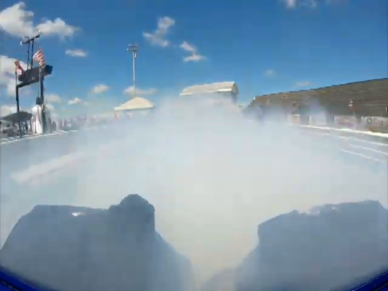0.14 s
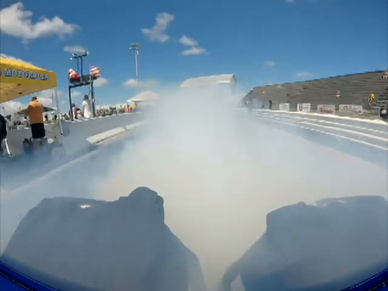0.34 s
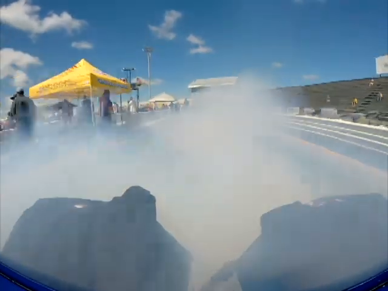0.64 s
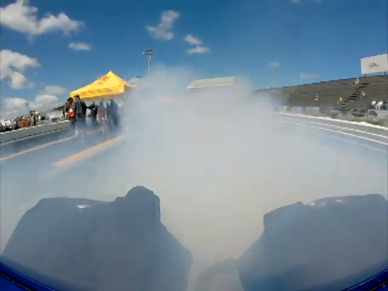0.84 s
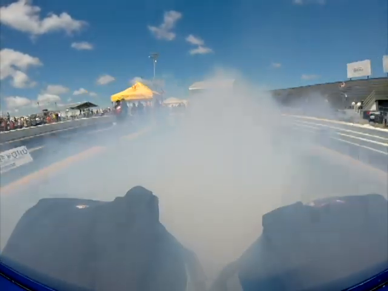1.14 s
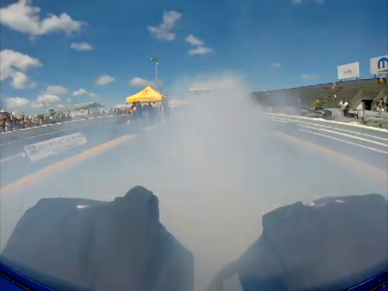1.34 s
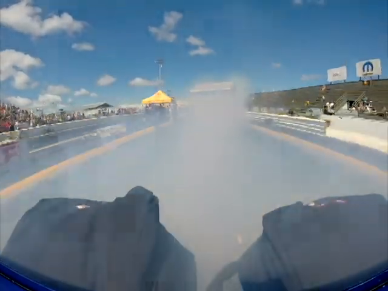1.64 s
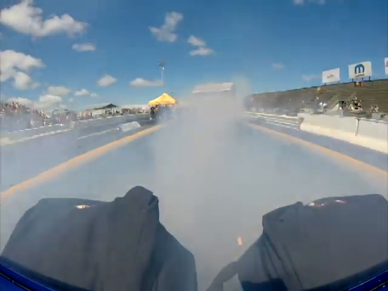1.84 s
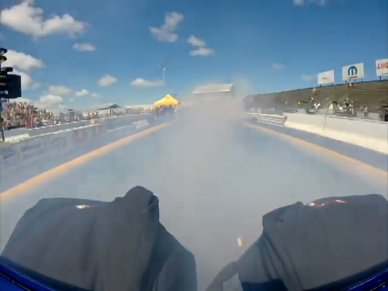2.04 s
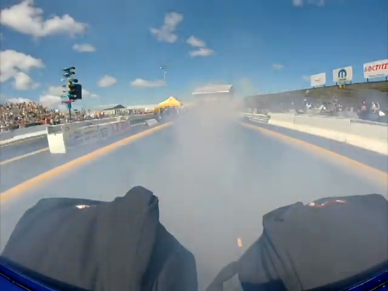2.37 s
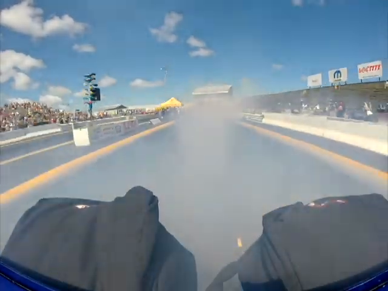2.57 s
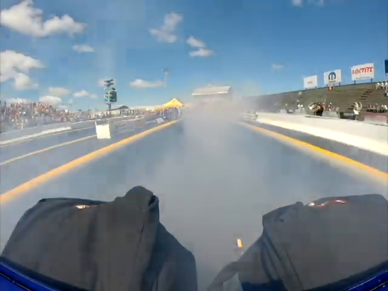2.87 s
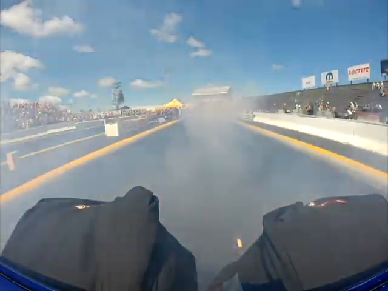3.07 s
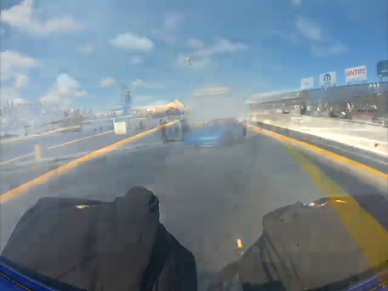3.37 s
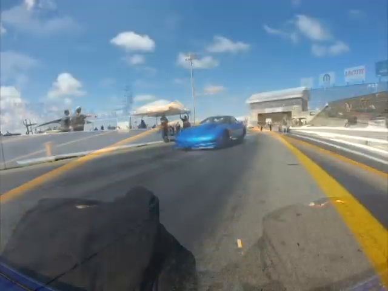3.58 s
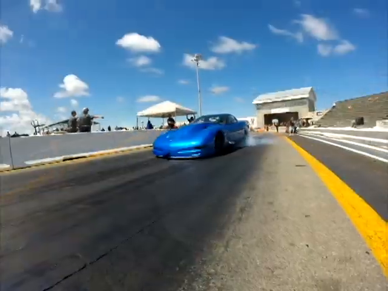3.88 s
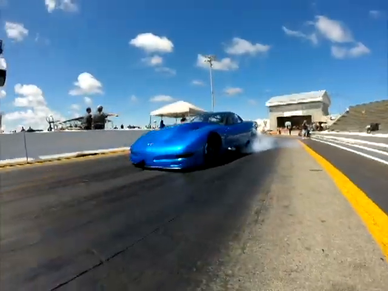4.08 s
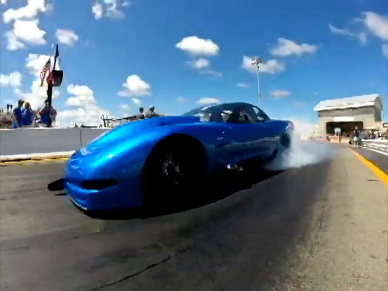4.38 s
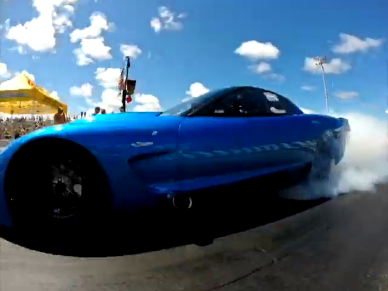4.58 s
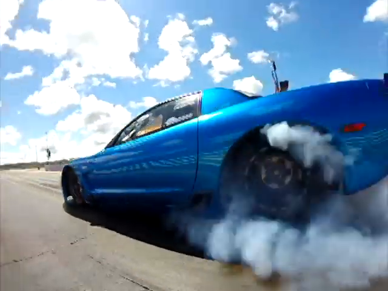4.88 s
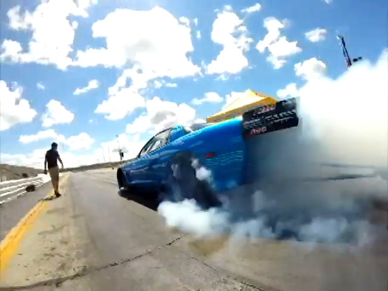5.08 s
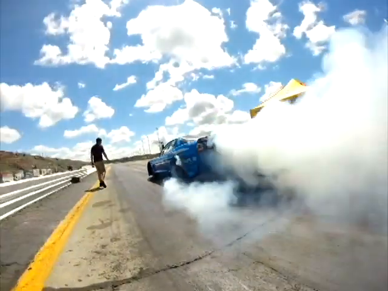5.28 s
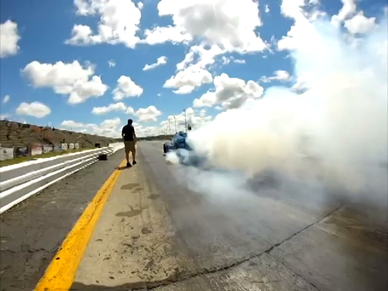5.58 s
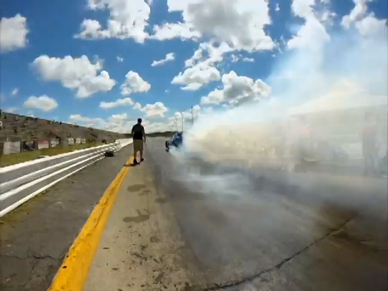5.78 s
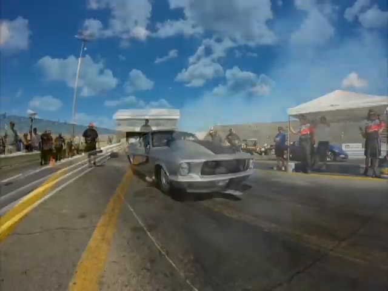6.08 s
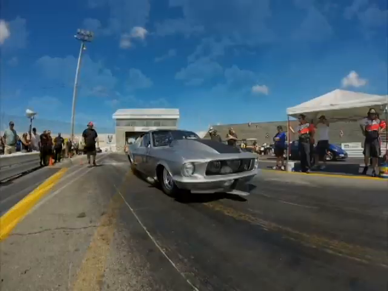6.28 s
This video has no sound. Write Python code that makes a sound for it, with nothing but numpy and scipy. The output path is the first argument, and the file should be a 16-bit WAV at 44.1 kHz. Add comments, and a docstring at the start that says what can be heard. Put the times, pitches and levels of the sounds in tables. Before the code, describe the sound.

Inside a race car the body booms and rattles, then another car passes at full throttle on hissing, spinning tyres.

```python
"""At a drag strip, three burnouts fade one into the next, heard by a small microphone in a hard shell.
First we ride in a car: the body booms, ticks and rattles over a rough exhaust, and a tyre chirps.
Then a car passes at full throttle on hissing tyres, lifts off, and its tyres chirp as they grip.
Last, another car winds up from low speed. Each exhaust is built from "orders": tones at whole
multiples of the rate at which the engine repeats its cycle."""
import sys
import numpy as np
from scipy import signal
from scipy.fft import rfft, irfft, next_fast_len
from scipy.io import wavfile

SR = 44100
rng = np.random.default_rng(int(sys.argv[2]) if len(sys.argv) > 2 else 0)


def dump_mix(stems):
    """Bounce the given channels to the path in sys.argv[1] as a 16-bit WAV at rate SR."""
    frames = np.atleast_2d(stems).T  # one column per channel
    limited = np.clip(frames, -1, 1)  # hard clip at full scale
    pcm = np.round(limited * 32767).astype(np.int16)
    wavfile.write(sys.argv[1], SR, pcm)


N = 283122

# The passing car's engine. Each row: time in seconds, cycle rate in Hz, base exhaust level in dB.
PASSING_ENGINE = [(3.12, 46.5, -44), (3.3, 48.25, -25), (3.58, 51.94, -20.5), (3.88, 54.22, -23.5),
                  (4.1, 56.6, -21.5), (4.3, 59.36, -25), (4.46, 61.16, -25), (4.72, 61.2, -27),
                  (4.9, 58.97, -24.5), (5.1, 54.76, -25), (5.38, 49.6, -26), (5.52, 47.57, -29.5),
                  (5.63, 39.7, -26), (5.76, 34.72, -27)]
# The last car's engine, with the same columns.
LAST_ENGINE = [(5.72, 15.3, -39), (5.95, 15, -31), (6.23, 20, -22.5), (6.37, 22, -19), (6.42, 22.8, -18)]
# Three noise colours. Each row: frequency in Hz, relative level in dB.
BLAST_COLOUR = [(60, -30), (150, 5.5), (300, 5), (700, 2), (1200, 5.5), (1500, -38)]   # a low rush, for exhaust gas and thuds
SCRUB_COLOUR = [(1200, -45), (1500, 0), (1900, -2.5), (2800, -7), (3400, -10.5)]   # the lower part of the tyre noise
HISS_COLOUR = [(2800, -6.5), (3600, -4.5), (4700, 5), (6500, 4.5), (8000, -9.5), (9500, -11)]   # the higher part


def from_db(db):
    """Turn decibels into a number to multiply by."""
    return 10 ** (np.asarray(db) / 20)


def rms_one(x):
    """Scale a signal so that its average strength (rms) is 1."""
    return x / np.sqrt(np.mean(x ** 2) + 1e-20)


def in_time(rows, fade_s=0.011):
    """Give a gate that fades to 0 outside a table's times, then a smooth curve for each other column."""
    t = np.arange(N) / SR
    times, *columns = np.transpose(rows)
    gate = np.clip(np.minimum(t - times[0], times[-1] - t) / fade_s + 1, 0, 1)
    return [gate] + [np.interp(t, times, column) for column in columns]


def drift(rate_hz):
    """A random wobble of about 1 either way; a higher rate makes it quicker."""
    pole = np.exp(-40 * np.pi * rate_hz / SR)
    noise = rng.standard_normal(N // 20 + 2002)   # one value for every 20 samples
    slow = signal.lfilter([1], [1, -2 * pole, pole * pole], noise)[2000:]   # skip while it settles
    return np.interp(np.arange(N) / 20, np.arange(len(slow)), rms_one(slow))


def coloured(x, colour):
    """Make each frequency as strong as a colour table says; the result has strength 1."""
    size = next_fast_len(N)
    hz = np.arange(size // 2 + 1) * SR / size + 1
    table_hz, table_db = np.transpose(colour)
    gain = from_db(np.interp(np.log(hz), np.log(table_hz), table_db))
    return rms_one(irfft(rfft(x, size) * gain, size)[:N])


def peaked(x, peaks):
    """Boost or cut one band of frequencies for each row of a table."""
    for hz, width_hz, db in peaks:
        gain = from_db(db / 2)
        width = np.pi * width_hz / SR
        middle = -2 * np.cos(2 * np.pi * hz / SR)
        x = signal.lfilter([1 + width * gain, middle, 1 - width * gain],
                           [1 + width / gain, middle, 1 - width / gain], x)
    return x


def phase_of(hz):
    """How far a tone of changing pitch has turned, in radians."""
    return 2 * np.pi * np.cumsum(hz) / SR


def orders(phase, multiples, levels_db, waver_db, waver_hz, slip, spread=0):
    """Add up wavering tones at multiples of a cycle; slip shakes and spread offsets them, in radians."""
    total = np.zeros(N)
    for k, db in zip(multiples, levels_db):
        gain = from_db(db + waver_db * drift(waver_hz))
        total -= gain * np.cos(k * phase + slip * drift(waver_hz) + spread * rng.normal())
    return rms_one(total)


def gusty(phase, beat_db, rough_db, rough_hz):
    """White noise that swells once a cycle and flickers at random."""
    return rng.standard_normal(N) * from_db(beat_db * np.cos(phase) + rough_db * drift(rough_hz))


def swelling(crests, dip_db):
    """A loudness curve that passes through the crests and sinks halfway between them."""
    t = np.arange(N) / SR
    times, db = np.transpose(crests)
    crest_count = np.interp(t, times, np.arange(len(times)))
    return from_db(np.interp(t, times, db) - dip_db * np.sin(np.pi * crest_count) ** 2)


def spikes(times, levels_db):
    """Silence with a one-sample spike at each time."""
    out = np.full(N, 1e-18)
    out[[round(s * SR) for s in times]] = from_db(levels_db)
    return out


def noise_bursts(hits, decay_s, colour):
    """Turn each spike into a burst of noise that dies away."""
    envelope = signal.lfilter([1], [1, -np.exp(-1 / (decay_s * SR))], hits)
    return envelope * coloured(rng.standard_normal(N), colour)


def body_boom():
    """The car's body booms at a low, unsteady pitch. Gives the sound and its phase."""
    # Each row: time in seconds, pitch in Hz, level in dB.
    boom = [(0.0, 41.85, -15), (0.15, 39.37, -14), (0.89, 41.38, -25.5), (1.26, 42.9, -16.5),
            (1.38, 44.44, -34), (1.98, 42.54, -12.5), (2.18, 39.03, -27), (2.36, 43, -19.5),
            (2.96, 43.9, -30), (3.28, 42.1, -19), (3.45, 40.5, -38), (3.7, 43, -23)]
    gate, hz, db = in_time(boom)
    phase = phase_of(hz + 0.86 * drift(6.4))
    return gate * from_db(db) * np.sqrt(2) * np.cos(phase), phase


def cabin_noise(boom_phase, engine_phase):
    """Noise comes through the body, shaken by the boom and the engine, while spinning tyres whine."""
    # The roar drops while the throttle is closed. Each row: time in seconds, level in dB.
    roar_levels = [(0.0, -26.5), (0.09, -29), (0.16, -36.5), (0.225, -26.5), (0.26, -35), (0.33, -33),
                   (0.37, -50), (0.55, -41), (0.63, -31.5), (0.97, -27.5), (1.38, -26), (1.98, -28.5),
                   (2.51, -24.5), (2.69, -29.5), (2.87, -23.5), (3.6, -28.5)]
    # Low, middle and high noise. Each row: frequency in Hz, relative level in dB.
    rumble_colour = [(25, -23), (45, 13.5), (100, 12.5), (190, 5.5), (260, 9.5), (300, -18), (400, -52.5)]
    roar_colour = [(200, -26), (300, -1), (400, 1), (600, 0), (720, -8), (1200, -13), (1500, -41.5)]
    rattle_colour = [(1000, -10.5), (1500, 0.5), (2400, -12.5), (3200, -16), (4600, -16.5), (7600, -23.5),
                     (8500, -34), (11000, -50), (14000, -80)]
    # Thin tyre whines. Each row: pitch in Hz, width in Hz, starting level in dB against the rattle.
    whines = [(2440, 40, -8), (2850, 50, -8)]
    gate, roar_db = in_time(roar_levels, fade_s=0.53)
    rumble_db, rattle_db = roar_db + 8.5, roar_db - 10.5
    shake = from_db(0.49 * drift(26))   # the body shakes roar and rattle together
    rumble = coloured(gusty(boom_phase, beat_db=1.5, rough_db=2.5, rough_hz=30), rumble_colour)
    roar = coloured(gusty(engine_phase, beat_db=2.5, rough_db=1.0, rough_hz=60), roar_colour)
    rattle = coloured(gusty(engine_phase, beat_db=0.5, rough_db=1.5, rough_hz=90), rattle_colour)
    out = from_db(rumble_db) * rumble + shake * (from_db(roar_db) * roar + from_db(rattle_db) * rattle)
    fade_db = 9.5 * np.maximum(np.arange(N) / SR - 1.35, 0)   # the whines sink from 1.35 s on
    for hz, width_hz, db in whines:
        gain = from_db(rattle_db + db + 2 * drift(4.0) - fade_db)
        # A narrow band of noise around a wandering pitch.
        out += gain * drift(width_hz) * np.cos(phase_of(hz * (1 + 0.011 * drift(2.5))))
    return gate * out


def gliding_notes():
    """Two brief, slightly unsteady tones stand out of the roar."""
    # Each row: peak time in seconds, width in seconds, pitch in Hz, glide in Hz a second, level in dB.
    notes = [(.04, .07, 341, -95, -23.5), (6.39, 0.011, 918, 600, -14.5)]
    out = np.zeros(N)
    for peak_s, width_s, hz, glide, db in notes:
        age = np.arange(N) / SR - peak_s
        envelope = from_db(db) * np.exp(-(age / width_s) ** 2)
        out += envelope * np.cos(2 * np.pi * (hz + glide * age / 2) * age + 0.33 * drift(30))
    return out


def metal_ticks(ring_hz=2070, ring_s=0.11):
    """A small metal part in the car ticks: each hit snaps, then rings at one thin pitch."""
    # Each row: start in seconds, level of the ring in dB.
    ticks = [(0.0194, -30.5), (0.042, -37), (0.0656, -28), (0.092, -28), (0.375, -44), (0.421, -53),
             (0.8235, -35), (0.8904, -34), (1.0081, -31), (1.077, -30), (1.3204, -29), (1.5354, -31),
             (1.6407, -30.5), (1.985, -35)]
    # The snap. Each row: frequency in Hz, relative level in dB.
    snap_colour = [(400, -10), (1000, -3.5), (2000, 1), (3000, -11.5), (5000, -21), (12000, -50)]
    hits = spikes(*np.transpose(ticks))
    decay = from_db(-60 / (ring_s * SR))   # 60 dB quieter after ring_s
    step = 2 * np.pi * ring_hz / SR
    ring = signal.lfilter([0, np.sin(step)], [1, -2 * decay * np.cos(step), decay * decay], hits)
    return ring + from_db(2.5) * noise_bursts(hits, decay_s=0.0022, colour=snap_colour)


def tyre_chirps(rise_s=0.04, hop_s=0.029, tail_db_per_s=400):
    """Rubber sticks and slips at a falling, ragged rate and spits noise with each hop."""
    # Each row: start and length in seconds, first pitch in Hz, fall in Hz a second,
    # levels of squeal, overtones and spit in dB, raggedness in radians.
    chirps = [(0.115, .07, 1906, 4480, -29, -36, -38, 2.9),
              (5.773, 0.083, 1707, 3220, -25, -20, -18.5, 0.86)]
    # The overtones: multiples of the pitch, and the relative level of each in dB.
    multiples = (2, 3, 4)
    levels_db = [0, -4, -5]
    out = np.zeros(N)
    for start_s, length_s, slip_hz, fall, squeal_db, overtone_db, spit_db, ragged in chirps:
        age = np.arange(N) / SR - start_s
        phase = phase_of(np.clip(slip_hz - fall * age, 500, 3000))
        squeal = orders(phase, [1], [0], waver_db=3.2, waver_hz=100, slip=ragged)
        overtones = orders(phase, multiples, levels_db, waver_db=4.5, waver_hz=110, slip=2 * ragged)
        tone = from_db(squeal_db) * squeal + from_db(overtone_db) * overtones
        spit = coloured(gusty(0, 0, rough_db=2.5, rough_hz=120), HISS_COLOUR)
        spit += 0.3 * coloured(rng.standard_normal(N), SCRUB_COLOUR)
        hops = np.maximum(age, 0) / hop_s
        # Each hop dies away by 10 dB and starts 3 dB below the one before.
        bursts = (age >= 0) * from_db(spit_db - 10 * (hops % 1) - 3 * np.floor(hops))
        rise = np.clip(age / rise_s + 0.6, 0, 1)
        tail = from_db(-tail_db_per_s * np.maximum(age - length_s, 0))
        out += tail * (rise * tone + bursts * spit)
    return out


def knocks(thud_s=0.00097):
    """Loose panels knock and the exhaust pops: each is a bright crack over an inward push of a panel."""
    # Each row: start in seconds, then the relative levels of crack and thud in dB.
    hits = [(0.21, -24, -24), (0.223, -22, -15), (0.2339, -15.5, -21), (0.2503, -28, -14),
            (0.268, -16.5, -14), (0.2773, -19.5, -7), (0.292, -24, -21), (0.2965, -23.5, -16),
            (0.303, -20, -11), (0.317, -24, -15.5), (0.3302, -30, -18), (0.335, -38, -33),
            (0.356, -36, -28), (1.3226, -27, -12)]
    # The crack. Each row: frequency in Hz, relative level in dB.
    tinny = [(700, -8), (1200, 7.5), (2500, 0.5), (4600, -14.5), (9000, -26), (15000, -50)]
    times, crack_db, thud_db = np.transpose(hits)
    crack = noise_bursts(spikes(times, crack_db - 1.5), decay_s=0.002, colour=tinny)
    age = np.arange(round(0.03 * SR)) / (thud_s * SR)   # 1 at the peak of the push
    push = signal.fftconvolve(spikes(times, thud_db + 2), age * np.exp(1 - age))[:N]
    return crack + push * (0.43 * coloured(rng.standard_normal(N), BLAST_COLOUR) - 1)


def cabin_exhaust():
    """The uneven exhaust heard from inside, led by order 5. Gives the sound and that order's phase."""
    # Engine speed. Each row: time in seconds, pitch of order 5 in Hz.
    speed = [(0.63, 82), (0.91, 113), (1.09, 115), (1.46, 104), (1.98, 100), (2.6, 97), (3.3, 91),
             (4.08, 85)]
    # The swells of order 5. Each row: time in seconds, level in dB.
    crests = [(.6, -26.5), (.9, -15.5), (1.27, -15.5), (1.6, -12.5), (1.88, -16), (2.36, -16.5),
              (2.63, -13), (2.97, -14), (3.3, -15), (3.66, -20.5), (4.0, -30)]
    # The other orders: multiples of the cycle, and the relative level of each in dB.
    multiples = (3, 4, 6, 7, 8, 9, 10, 11, 12, 13)
    levels_db = [-9.5, -14.5, -13, -9.5, -13.5, 2.5, 2.5, 3, -11, -8.5]
    t = np.arange(N) / SR
    gate, fifth_hz = in_time(speed, fade_s=0.038)
    phase = phase_of(fifth_hz)
    fifth = swelling(crests, dip_db=8) * np.sqrt(2) * np.cos(phase + 0.78 * drift(4.6))
    others = orders(phase / 5, multiples, levels_db, waver_db=3, waver_hz=10.7, slip=0.27, spread=1.45)
    # They build up until 0.88 s and die away from 3 s.
    others_db = -19.5 - 28 * np.maximum(0.88 - t, 0) - 16 * np.maximum(t - 3, 0)
    return gate * (fifth + from_db(others_db) * others), phase


def floor_hum(hz=193.2, start_s=1.9, end_s=3.7, crest_s=2.23, beat_s=0.428):
    """A floor panel hums along in slow beats."""
    t = np.arange(N) / SR
    gate, = in_time([(start_s,), (end_s,)])
    db = -14 - 11.5 * np.abs(np.sin(np.pi * (t - crest_s) / beat_s))
    return gate * from_db(db) * np.sqrt(2) * np.cos(2 * np.pi * hz * t + 1.23 * drift(5.9))


def grit():
    """Grit clicks against the body, each grain a short burst of bright noise."""
    # Each row: start in seconds, relative level in dB.
    grains = [(2.2175, -40), (2.3632, -33), (2.3991, -31), (2.429, -29), (2.449, -31), (2.5168, -30),
              (2.6715, -31), (2.7588, -34), (2.7817, -24.5), (2.8137, -31), (2.8676, -20.5), (2.9409, -22),
              (2.9713, -21), (2.991, -25), (3.0222, -27), (3.093, -37)]
    # The click. Each row: frequency in Hz, relative level in dB.
    click_colour = [(1000, -10), (2500, -3), (4500, 1), (7500, -5), (11000, -21), (15000, -31)]
    times, db = np.transpose(grains)
    return noise_bursts(spikes(times, db - 6), decay_s=0.0035, colour=click_colour)


def engine_beat():
    """The phase that trackside noise pulses to: the passing car's cycle, then the last car's order 3."""
    _, passing_hz, _ = in_time(PASSING_ENGINE)
    last_gate, last_hz, _ = in_time(LAST_ENGINE)
    return np.where(last_gate > 0.5, phase_of(3 * last_hz), phase_of(passing_hz))


def spinning_tyres(beat):
    """Tyres scrub and hiss on the track, pulsing with the engine. Gives the sound and the scrub's gain."""
    # Each row: time in seconds, hiss level in dB, scrub level in dB above the hiss.
    levels = [(2.8, -57, 3), (3.0, -58, 7), (3.2, -39, 8.5), (3.33, -29, 2.5), (3.45, -26.5, 2.5),
              (3.69, -18.5, 1), (3.9, -18.5, -3), (4.3, -17, -0.5), (4.52, -17.5, 1), (4.68, -19, -4.5),
              (4.84, -21.5, -1.5), (5.35, -27, -1.5), (5.54, -27, -2.5), (5.7, -26, -11), (5.88, -33, -1),
              (6.08, -28.5, -1), (6.42, -20.5, -0.5)]
    # The airy top of the hiss. Each row: frequency in Hz, relative level in dB.
    air_colour = [(7000, -27), (8500, -15), (11000, 11), (13000, 12), (14500, -14), (15500, -33)]
    # The scrubbing tread rings. Each row: frequency in Hz, width in Hz, boost in dB.
    tread_rings = [(1730, 160, 4.5), (2540, 120, 3.5), (2885, 103, 3), (4670, 200, 4)]
    gate, hiss_db, scrub_db = in_time(levels, fade_s=0.22)
    scrub_gain = from_db(hiss_db + scrub_db)
    air_db = hiss_db.max() + 1.35 * (hiss_db - hiss_db.max()) - 10.5   # fades faster than the hiss
    shudder = from_db(0.24 * drift(5.7))   # the tyres hop on the tarmac
    bands = (scrub_gain, SCRUB_COLOUR), (from_db(hiss_db), HISS_COLOUR), (from_db(air_db), air_colour)
    out = np.zeros(N)
    for gain, colour in bands:
        noise = coloured(gusty(beat, beat_db=1.5, rough_db=1.8, rough_hz=70), colour)
        out += gain * rms_one(peaked(noise, tread_rings))
    return gate * shudder * out, scrub_gain


def passing_car(blast, scrub_gain, passed_s=4.86, turn_s=0.037, lift_s=5.565):
    """Exhaust pulses ring in tail pipes that turn toward us as the car goes by; then the throttle shuts."""
    # The swells of order 5. Each row: time in seconds, level in dB.
    crests = [(3.1, -24), (3.34, -17), (3.57, -23.5), (3.9, -19.5), (4.27, -18), (4.6, -20), (4.85, -18),
              (5.06, -17), (5.29, -18.5), (5.6, -24.5), (5.85, -28)]
    # Orders other than 3, 5 and 8: multiples of the cycle, and the relative level of each in dB.
    multiples = (1, 2, 4, 6, 7, 9, 10, 11, 12, 13, 14, 15, 16, 17, 18, 19, 20, 21, 22, 23, 24)
    levels_db = [-4.5, -6, 9, 3, -10, 1, 4, 2.5, -2.5, 9, 1, -5, 4.5, 3.5, -1, -14, -5.5, -1.5, -0.5, -12,
                 -5]
    # How the pipes ring, and how they sound from ahead and from behind.
    # Each row: frequency in Hz, width in Hz, boost or cut in dB.
    pipe_rings = [(379.6, 20, 12), (716, 49, 0.5), (760, 35, -7.5), (880, 94, 2)]
    from_ahead = [(1140, 83, 3.5)]
    from_behind = [(716.3, 610, 6), (1300, 250, -8), (1900, 600, 3.5)]
    t = np.arange(N) / SR
    gate, cycle_hz, exhaust_db = in_time(PASSING_ENGINE)
    cycle = phase_of(cycle_hz)
    third = from_db(-2.5 + 2.5 * drift(4)) * np.cos(3 * cycle)
    fifth = swelling(crests, dip_db=6.5) * np.cos(5 * cycle)
    eighth = from_db(-7 + 3 * drift(5)) * np.cos(8 * cycle)
    others = orders(cycle, multiples, levels_db, waver_db=3.2, waver_hz=6, slip=0.55, spread=1.1)
    exhaust = from_db(exhaust_db) * peaked(others - np.sqrt(2) * (third + eighth), pipe_rings)
    # Sharp pulses add a snarl of high orders, whose level follows the tyre scrub.
    snarl = rms_one(sum(np.cos(k * cycle + 2 * np.pi * rng.random()) for k in range(25, 44)))
    exhaust += scrub_gain * from_db(-9) * snarl + from_db(exhaust_db - 7) * blast
    behind = 1 / (1 + np.exp((passed_s - t) / turn_s))   # goes from 0 to 1 as the car passes
    exhaust = (1 - behind) * peaked(exhaust, from_ahead) + behind * peaked(exhaust, from_behind)
    throttle = from_db(-15.5 * np.clip((t - lift_s) / 0.0065, 0, 1))   # drops all but order 5
    return gate * (throttle * exhaust - np.sqrt(2) * fifth)


def thumps(width_s=0.031):
    """Low noise swells into dull thumps while the car is alongside."""
    # Each row: peak time in seconds, relative level in dB.
    swells = [(4.6, -14.5), (4.73, -15.5), (4.93, -14.5), (5.07, -18)]
    # Each row: frequency in Hz, relative level in dB.
    dull = [(50, -41), (90, -9.5), (250, -3), (450, -9), (900, -54)]
    t = np.arange(N) / SR
    envelope = sum(from_db(db - 9) * np.exp(-((t - peak_s) / width_s) ** 2) for peak_s, db in swells)
    return envelope * coloured(rng.standard_normal(N), dull)


def last_car(blast, pipe_hz=315, pipe_width_hz=32):
    """An engine winds up; order 16 swells as it climbs through the pitch at which the pipe rings."""
    # Orders other than 5 and 16: multiples of the cycle, and the relative level of each in dB.
    multiples = (3, 6, 8, 9, 10, 11, 13, 14, 15, 19, 21)
    levels_db = [-1.5, -7, 0.5, -10, -5, -1.5, -5.5, -10, -7, -8, -25]
    gate, cycle_hz, exhaust_db = in_time(LAST_ENGINE)
    cycle = phase_of(cycle_hz)
    fifth = from_db(-5) * np.cos(5 * cycle)
    pipe_boost_db = 14 * np.exp(-((16 * cycle_hz - pipe_hz) / pipe_width_hz) ** 2)
    sixteenth = from_db(-13.5 + pipe_boost_db) * np.cos(16 * cycle)
    others = orders(cycle, multiples, levels_db, waver_db=5, waver_hz=6.5, slip=0.55, spread=1.6)
    tones = from_db(2) * others - np.sqrt(2) * (fifth + sixteenth)
    return gate * from_db(exhaust_db) * (tones + from_db(-3.5) * blast)


def scene():
    """Add up the sounds in the car and beside the track, in one channel."""
    boom, boom_phase = body_boom()
    exhaust, engine_phase = cabin_exhaust()
    mix = boom + exhaust + floor_hum() + cabin_noise(boom_phase, engine_phase)
    mix += knocks() + metal_ticks() + grit() + gliding_notes()
    beat = engine_beat()
    tyres, scrub_gain = spinning_tyres(beat)
    blast = coloured(gusty(beat, beat_db=2, rough_db=1.5, rough_hz=60), BLAST_COLOUR)   # exhaust gas
    mix += tyres + passing_car(blast, scrub_gain) + thumps() + last_car(blast) + tyre_chirps()
    return mix[None]


def record(dry, cutoff_hz=15350):
    """The microphone's shell colours the sound, loud peaks are rounded and the top treble is cut."""
    # The shell's peaks and dips. Each row: frequency in Hz, width in Hz, boost or cut in dB.
    shell = [(1248, 46, 9), (1404, 223, -3.5), (1745, 370, 3.5), (2080, 140, -2), (2430, 59, 1),
             (2810, 42, -0.5), (3230, 180, -9), (3660, 580, -1.5), (4616, 310, 3), (5294, 300, -12.5),
             (5610, 210, 2), (6665, 270, -6.5), (6625, 100, 2), (8750, 450, -7), (9700, 274, -8),
             (11480, 580, 0.5), (12830, 5500, -13.5)]
    rounded = 1.4 * np.tanh(peaked(dry, shell) / 1.4)
    return signal.sosfilt(signal.cheby2(12, 60, cutoff_hz, fs=SR, output="sos"), rounded)


dry = scene()
out = record(dry)
dump_mix(out)
```